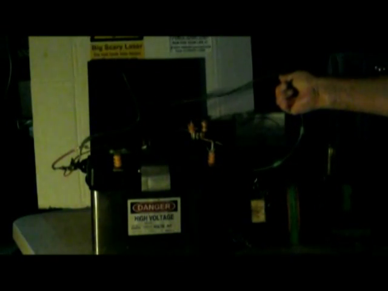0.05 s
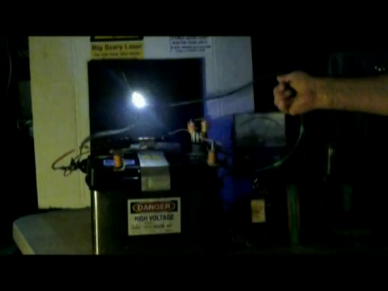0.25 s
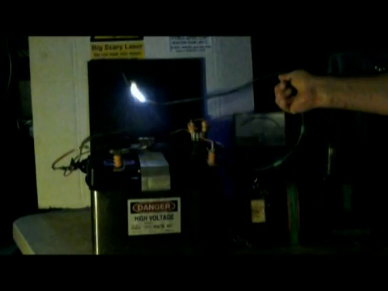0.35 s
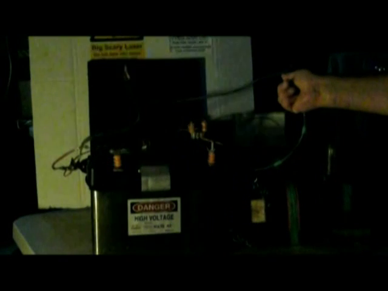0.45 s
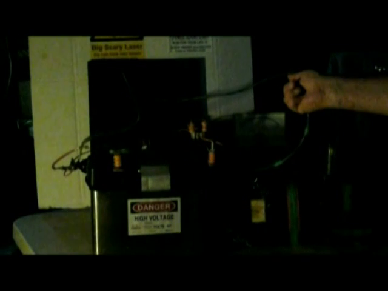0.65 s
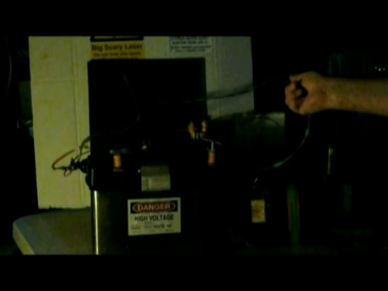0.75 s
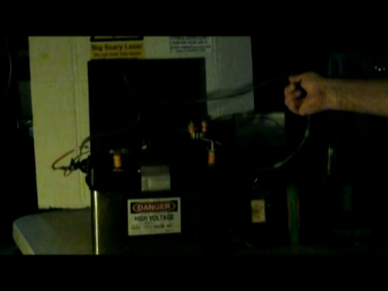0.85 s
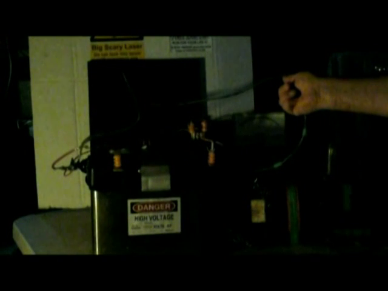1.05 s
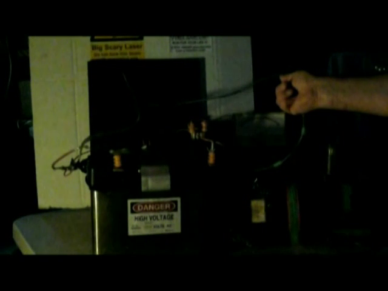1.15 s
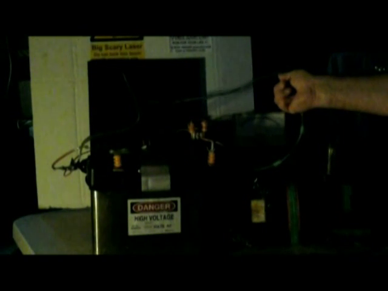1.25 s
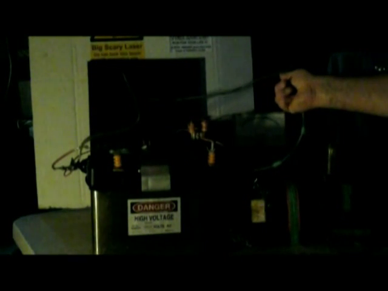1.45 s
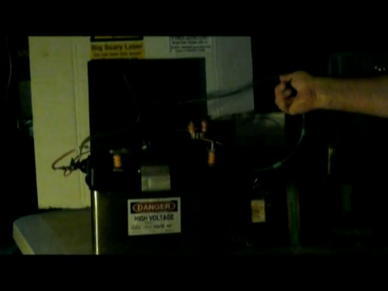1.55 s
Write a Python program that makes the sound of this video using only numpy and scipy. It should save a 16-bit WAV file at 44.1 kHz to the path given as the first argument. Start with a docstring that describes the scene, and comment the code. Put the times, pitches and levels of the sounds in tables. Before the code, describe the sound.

A high-voltage spark gap fires with one loud, overloading bang and a sizzling arc. A ragged run of sharp sparks follows over a brief transformer growl, ringing in a small hard room, then faint hum and hiss remain.

```python
"""In a small hard room a high-voltage gap breaks down: one big bang with a sizzling arc, then a ragged
run of sparks in step with the 50 Hz mains. Short ringing tones and reverberation follow each spark,
and the transformer growls while it feeds them. The bangs overload the microphone and
push its gain control down; it recovers as the room dies away.
Around them are mains hum, soft room noise and a few faint high chirps."""
import sys
import numpy as np
from scipy import signal
from scipy.fft import rfft, irfft
from scipy.io import wavfile
from scipy.ndimage import uniform_filter1d

SR = 44100
rng = np.random.default_rng(int(sys.argv[2]) if len(sys.argv) > 2 else 0)


def to_wav(s):
    """Save 16-bit WAV."""
    ch = np.atleast_2d(s).T  # columns
    pcm = np.round(np.clip(ch, -1, 1) * 32767)  # PCM
    wavfile.write(sys.argv[1], SR, pcm.astype(np.int16))


N = 70560

# breakdowns of the gap: (t/s, relative level/dB, extra treble/dB, extra body/dB)
SPARKS = [(0.2438, 27.5, 2, 7.5), (0.261, 18, -2.5, -9), (0.295, 16.5, -4, -15), (0.3192, 14.5, 3, -4),
          (0.355, 12.5, 1, 4.5), (0.3749, 12.5, 7, -5), (0.4152, 9.5, 2.5, 5), (.4546, 13.5, 2.5, 0.5),
          (0.4752, 10.5, 2, 2), (.4947, 9.5, -4.5, 1.5), (.5148, 9.5, -4, 2), (0.5349, 13.5, -4.5, 2.5)]
SPARK_SIDE_DB = -16   # stereo side relative to mid


def from_db(db):
    """Amplitude ratio: 20 dB to a factor of ten."""
    return 10 ** (np.asarray(db) / 20)


def at_hz(points, hz):
    """Interpolation of a table on a log-frequency axis."""
    f, value = np.transpose(points)
    return np.interp(np.log(np.maximum(hz, 1)), np.log(f), value)


def shaped(white, gain):
    """Spectral shaping: white noise is coloured at about constant power."""
    return irfft(rfft(white) * gain / np.sqrt(np.mean(gain ** 2)), white.shape[-1])


def stereo_noise(size, side_db):
    """Partial coherence: a weak side signal leaves white noise nearly alike in both channels."""
    mid, side = rng.standard_normal((2, size))
    return mid + from_db(side_db) * side * np.array([[1], [-1]])


def smooth(x, seconds):
    """First-order lag with the given time constant."""
    r = np.exp(-1 / (seconds * SR))
    return signal.lfilter([1 - r], [1, -r], x)


def fade(t, t60):
    """Exponential decay by 60 dB in the time t60."""
    return np.exp(-np.log(1000) * t / t60)


def mains_tones(lines):
    """Amplitude modulation: slow noise makes each mains harmonic waver a little."""
    t, hz = np.arange(N) / SR, np.fft.rfftfreq(N, 1 / SR)
    out = 0
    for line_hz, db in lines:
        waver_db = 1.2 * shaped(rng.standard_normal(N), np.exp(-(hz / 8) ** 2))
        tone = np.sqrt(2) * np.sin(2 * np.pi * (line_hz * t + rng.random()))
        out = out + from_db(db + waver_db) * tone
    return out


def mains_hum():
    """A line spectrum: the idle hum lies near even harmonics of the 50 Hz mains."""
    # partials of the hum: (f/Hz, level/dB)
    partials = [(199.3, -55), (300.2, -55.5), (399, -69), (500.3, -55), (599, -65.5), (899.5, -65.5)]
    return mains_tones(partials)


def room_noise():
    """Stationary broadband noise: soft air noise under microphone hiss."""
    # spectrum of air noise and hiss: (f/Hz, relative spectral level/dB)
    spectrum = [(25, -26), (60, -11), (110, -4.5), (200, -1.5), (450, -7.5), (900, -6.5), (1400, -11),
                (2100, -19.5), (3100, -16), (4100, -21.5), (5200, -20.5), (6200, -28), (7500, -20.5),
                (8400, -25), (9400, -20), (10300, -25), (11500, -19), (12600, -25), (13400, -18)]
    level_db, top_hz = -47, 13370
    hz = np.fft.rfftfreq(N, 1 / SR)
    gain = from_db(at_hz(spectrum, hz)) / np.sqrt(1 + (hz / top_hz) ** 120)
    return from_db(level_db) * shaped(stereo_noise(N, side_db=-39.5), gain)


def chirps():
    """Narrow-band noise has a blurred pitch: thin whistles swell and fade."""
    # faint chirps: (onset t/s, duration/s, centre f/Hz, level/dB)
    whistles = [(.16, .06, 4580, -61), (.92, .13, 5100, -58), (1.17, .14, 4520, -55),
                (1.28, .11, 4590, -58), (1.44, .16, 5150, -59)]
    half_width_hz = 110
    t, hz = np.arange(N) / SR, np.fft.rfftfreq(N, 1 / SR)
    out = 0
    for onset, length, pitch_hz, db in whistles:
        whistle = shaped(rng.standard_normal(N), 1 / (1 + ((hz - pitch_hz) / half_width_hz) ** 2))
        swell = np.sin(np.pi * np.clip((t - onset) / length, 0, 1))
        out = out + from_db(db) * swell * whistle
    return out


def spark_gain(hz, treble_db, body_db):
    """Spectral envelope of a spark, with a treble shelf and a bump for the bark of a heavy one."""
    # colour of a spark: (f/Hz, relative spectral level/dB)
    spectrum = [(30, -12), (120, -62), (280, -25.5), (420, -11.5), (650, -3), (800, 0.5), (1000, 5.5),
                (1120, -4), (1300, 4), (2100, -0.5), (2900, 6), (3700, 3), (4300, 1), (5100, 4.5),
                (5900, -4), (6700, -5.5), (7500, 1), (8300, -3), (9400, 6.5), (10300, -2.5), (11500, 6.5),
                (12800, 3.5), (13700, 3), (14500, -3), (15500, -25)]
    treble_hz, body_hz, body_octaves = 7130, 916, 0.5
    shelf = hz ** 4 / (hz ** 4 + treble_hz ** 4)
    bump = np.exp(-(np.log2((hz + 1) / body_hz) / body_octaves) ** 2)
    return from_db(at_hz(spectrum, hz) + treble_db * shelf + body_db * bump)


def sparks():
    """Impulse response: early reflections, short ringing tones and reverberation follow each crack."""
    # short ringing tones after each spark: (f/Hz, relative level/dB, T60/s)
    ring_tones = [(783, -20, 0.23), (1040, -22, 0.14), (1308, -16.5, 0.096), (1293, -24.5, 0.24),
                  (1594, -21, 0.24), (2958, -13, 0.15), (3433, -17.5, 0.27)]
    # reverberation time of the room by band: (f/Hz, T60/s)
    room_t60 = [(100, .15), (400, 0.33), (1000, 0.24), (3000, 0.24), (7000, 0.22), (14000, 0.21)]
    # colour of the reverberation: (f/Hz, relative level/dB)
    room_colour = [(100, 4), (500, 2), (1000, 5), (3000, 10.5), (7000, 11), (14000, 6.5)]
    room_db, room_build_s = -3, 0.053
    same_path = 0.56   # share of the echo power in a pattern common to all sparks
    size = 24000
    t, hz = np.arange(size) / SR, np.fft.rfftfreq(size, 1 / SR)
    # dense reflections off the bench and nearby wall hold for 7 ms, then die
    near = fade(np.maximum(t - .007, 0), t60=.032)
    ring = sum(from_db(db) * fade(t, t60) * np.sin(2 * np.pi * f * t) for f, db, t60 in ring_tones)
    swell = from_db(room_db) * (1 - np.exp(-t / room_build_s))
    band_centres = np.array(room_t60)[:, 0]
    band = np.argmin(abs(np.log((hz[:, None] + 1) / band_centres)), axis=1)
    tails = [swell * fade(t, t60) for _, t60 in room_t60]
    walls = from_db(at_hz(room_colour, hz))
    common = np.array([stereo_noise(size, SPARK_SIDE_DB) for _ in range(2)])
    out = np.zeros((2, N + size))
    for onset, db, treble_db, body_db in SPARKS:
        own = np.array([stereo_noise(size, SPARK_SIDE_DB) for _ in range(2)])
        echoes = np.sqrt(same_path) * common + np.sqrt(1 - same_path) * own
        early, late = shaped(echoes, spark_gain(hz, treble_db, body_db))
        late_spectrum = rfft(late) * walls
        room = sum(irfft(late_spectrum * (band == k), size) * tail for k, tail in enumerate(tails))
        start = int(onset * SR)
        out[:, start:start + size] += from_db(db) * (early * near + ring + room)
    return out[:, :N]


def arc():
    """Shot noise: after the first bang the arc burns on as dense random crackle, weakens and goes out."""
    level_db, sag_db_per_s, burn_s, crackles_per_s = 15, 120, .05, 4000
    age, hz = np.arange(N) / SR - SPARKS[0][0], np.fft.rfftfreq(N, 1 / SR)
    chance = crackles_per_s / SR
    crackle = stereo_noise(N, SPARK_SIDE_DB) * (rng.random(N) < chance) / np.sqrt(chance)
    burn = (age > 0) * from_db(level_db - sag_db_per_s * age)
    extinction = fade(np.maximum(age - burn_s, 0), t60=0.45)
    return burn * extinction * shaped(crackle, spark_gain(hz, treble_db=-1, body_db=0))


def transformer():
    """Forced vibration: the core growls at mains harmonics, sagging, while the gap draws current."""
    # partials of the core under load: (f/Hz, level before the sag/dB)
    partials = [(200, -12), (400, -32), (500, -12), (600, -16)]
    on_s, off_s, ramp_s, sag_db_per_s = .288, .565, .02, 60
    t = np.arange(N) / SR
    load = np.clip(np.minimum(t - on_s, off_s - t) / ramp_s, 0, 1)
    return load * from_db(-sag_db_per_s * (t - on_s)) * mains_tones(partials)


def scene():
    """Superposition: sparks, arc and transformer add to the quiet sounds of the room."""
    return sparks() + arc() + transformer() + mains_hum() + room_noise() + chirps()


def record(dry):
    """Compression: bangs duck the gain and clip; the bass is thinned and the highest treble cut off."""
    limit_db, sense_s, attack_s, release_db_per_s = -7.5, 0.015, 0.0015, 80.5
    clip_level, hardness = 0.59, 5.06
    bass_loss_db, bass_hz, cutoff_hz = -5.5, 250, 15300
    mid = dry.mean(axis=0)
    level_db = 10 * np.log10(smooth(mid ** 2, sense_s) + 1e-12)
    excess_db = np.maximum(level_db - limit_db, 0)
    # the cut follows each peak up, then falls back at the release rate
    recovery_db = release_db_per_s * np.arange(N) / SR
    cut_db = np.maximum.accumulate(excess_db + recovery_db) - recovery_db
    gain = from_db(-smooth(cut_db, attack_s))
    # the mid signal clips softly; the side follows a running mean of that squash
    squash = (2 + abs(gain * mid / clip_level) ** hardness) ** (-1 / hardness)
    out = gain * (mid * squash + (dry - mid) * uniform_filter1d(squash, size=30))
    hz = np.fft.rfftfreq(N, 1 / SR)
    bass_shelf = from_db(bass_loss_db / (1 + (hz / bass_hz) ** 2))
    low_pass = 1 / np.sqrt(1 + (hz / cutoff_hz) ** 160)
    return irfft(rfft(out) * bass_shelf * low_pass, N)


dry = scene()
out = record(dry)
to_wav(out)
```